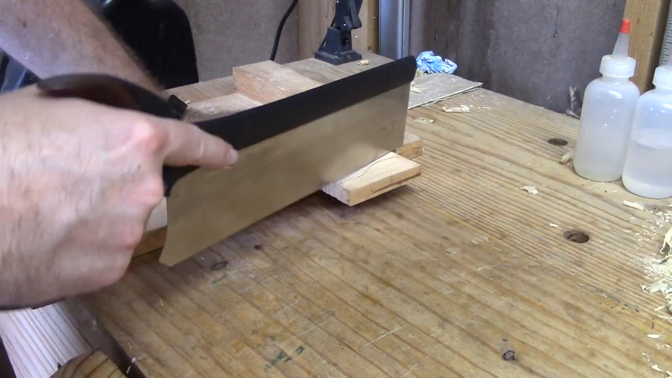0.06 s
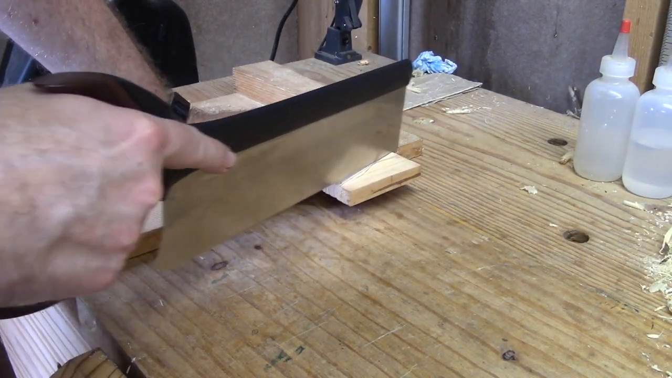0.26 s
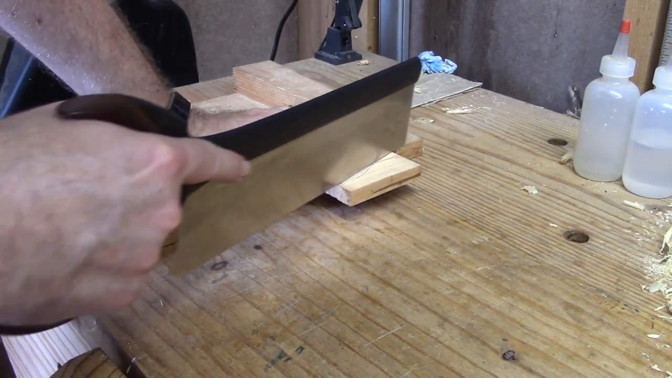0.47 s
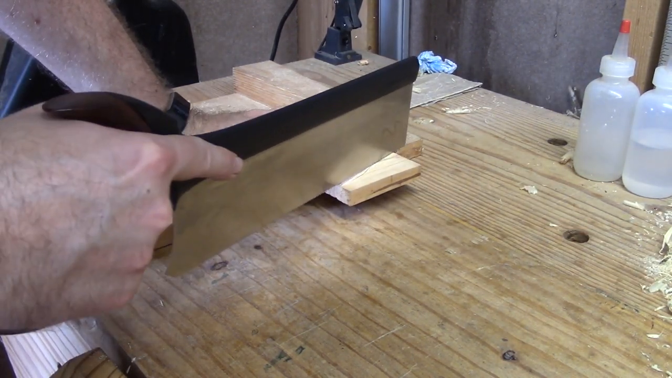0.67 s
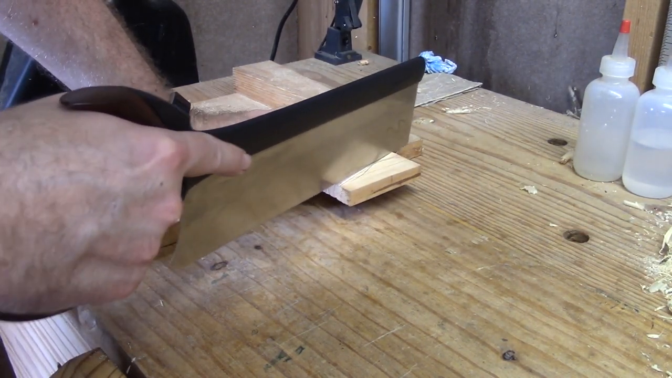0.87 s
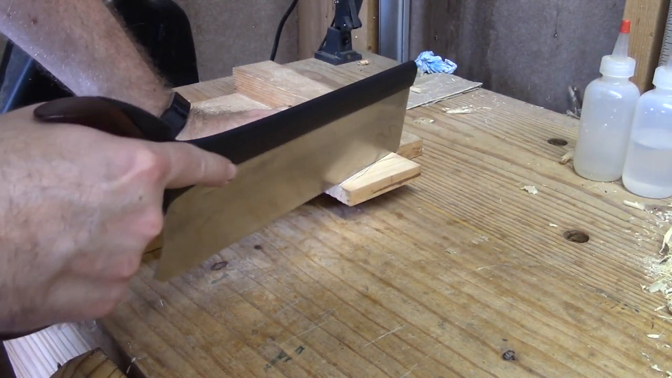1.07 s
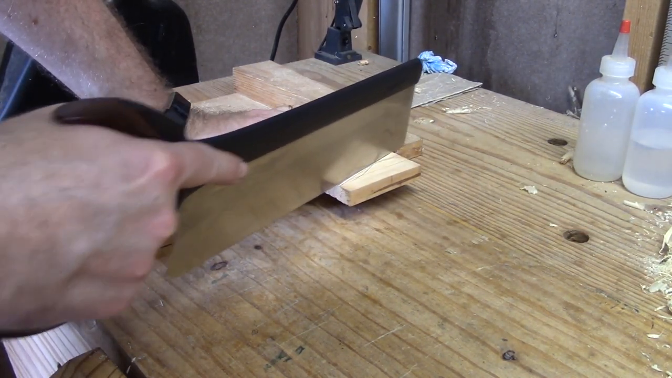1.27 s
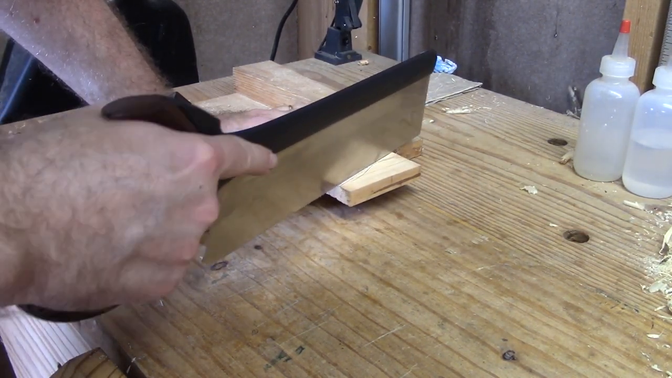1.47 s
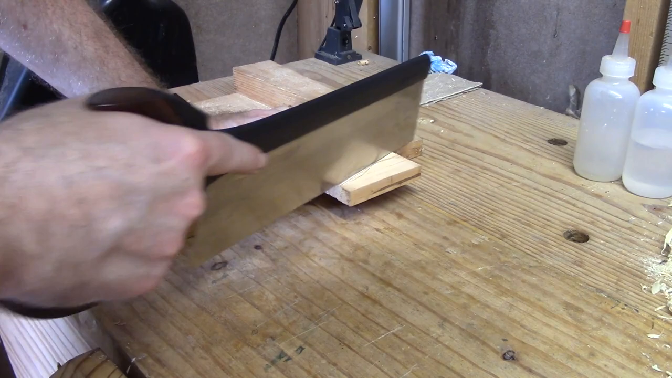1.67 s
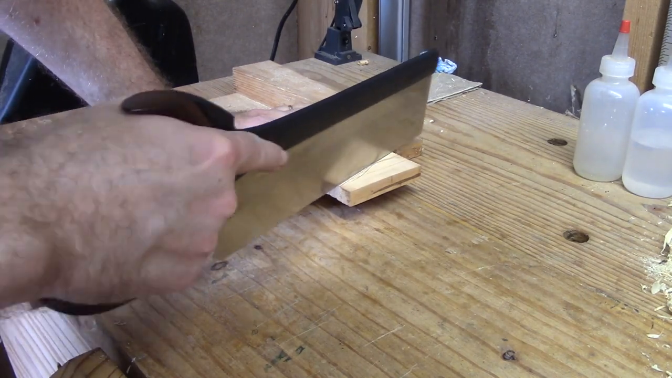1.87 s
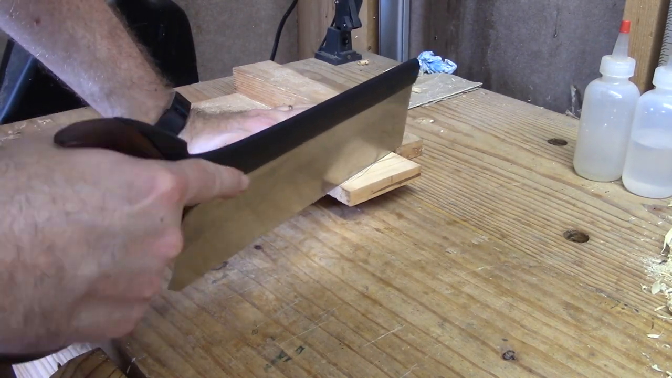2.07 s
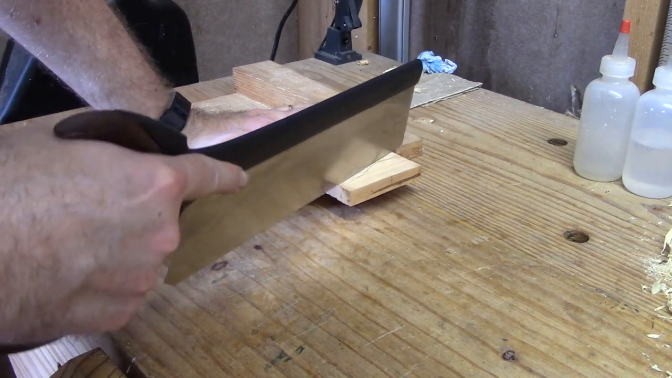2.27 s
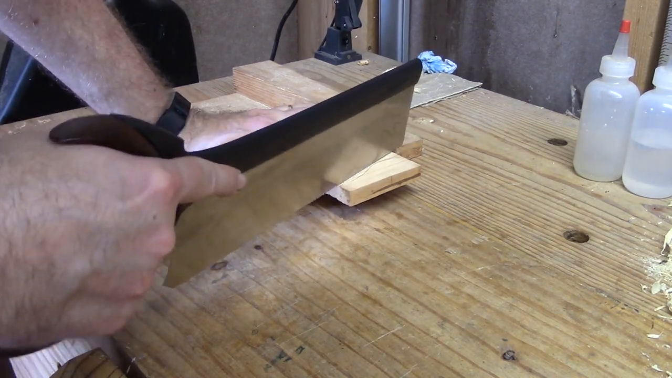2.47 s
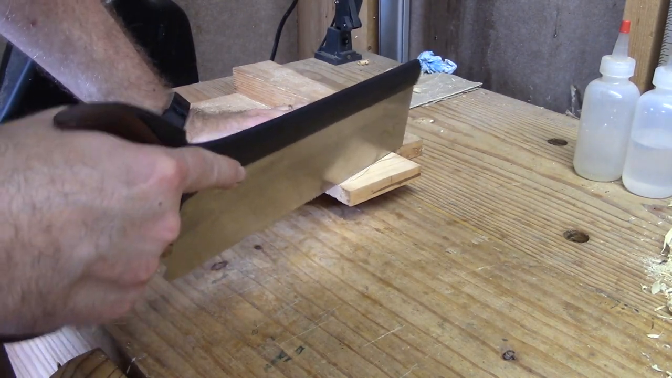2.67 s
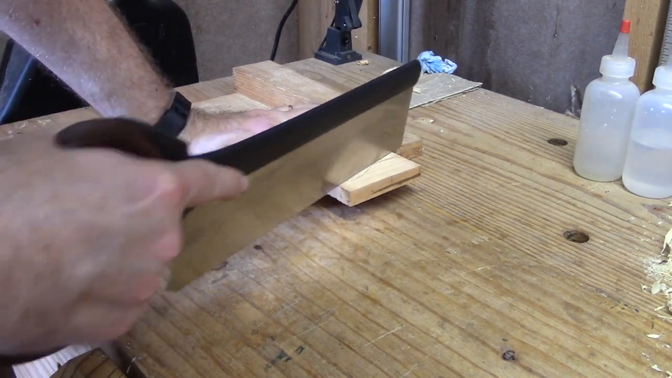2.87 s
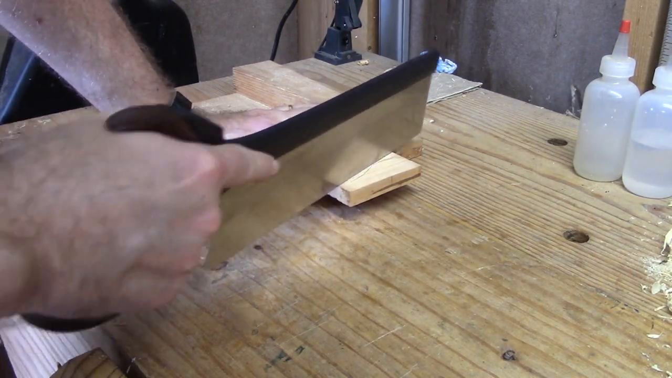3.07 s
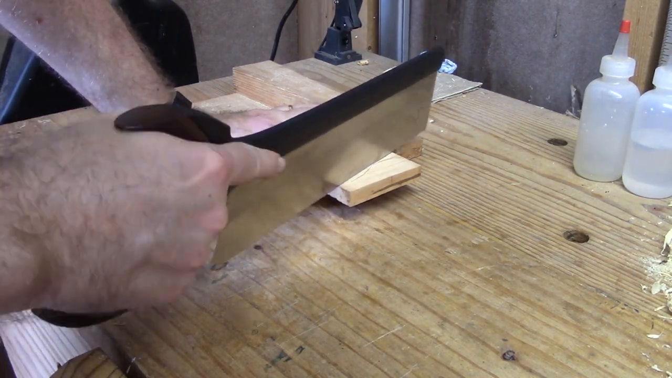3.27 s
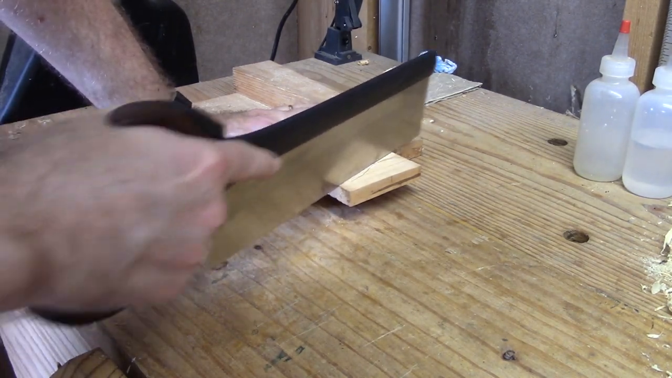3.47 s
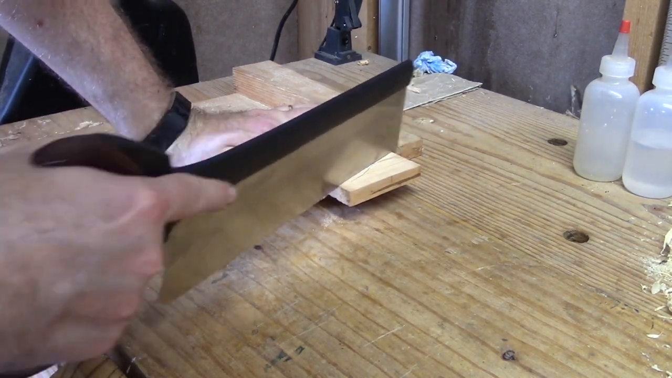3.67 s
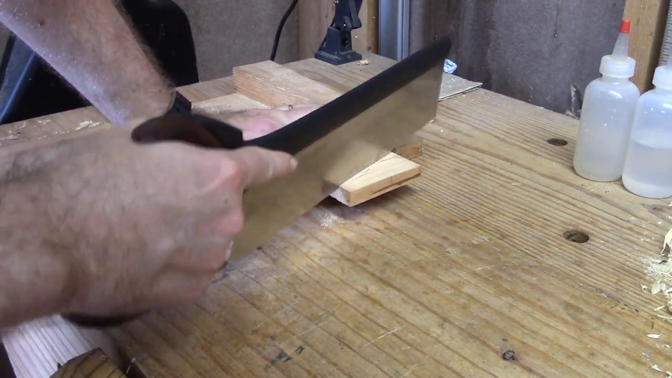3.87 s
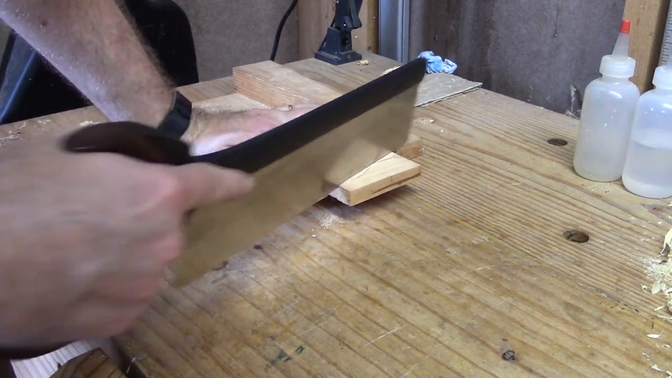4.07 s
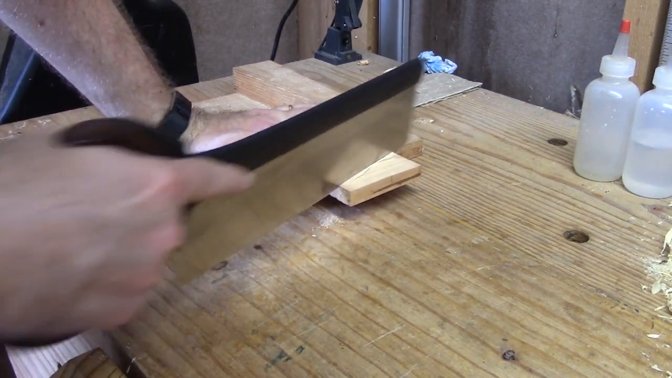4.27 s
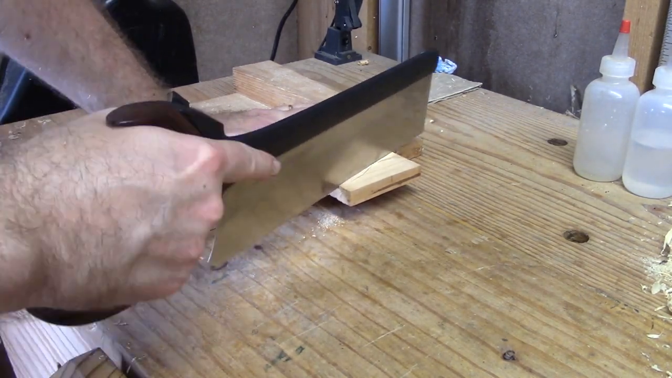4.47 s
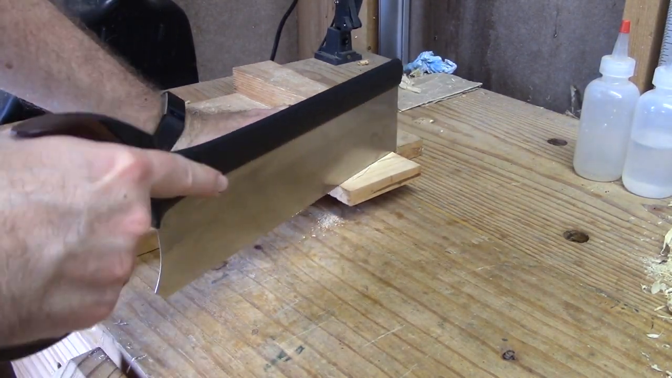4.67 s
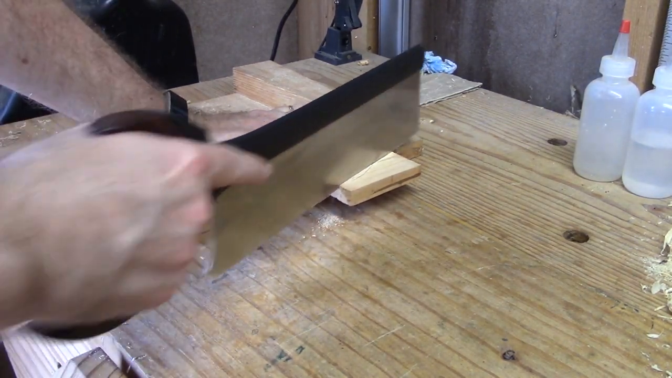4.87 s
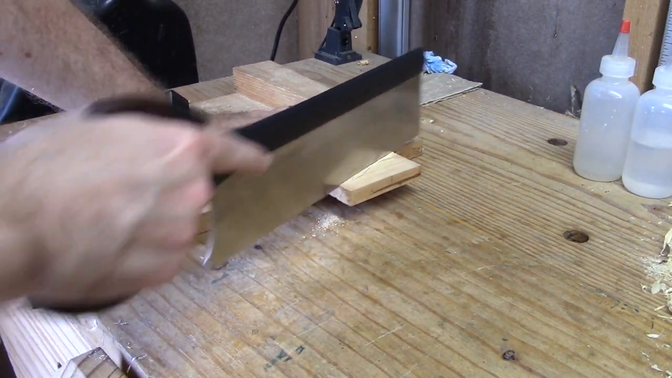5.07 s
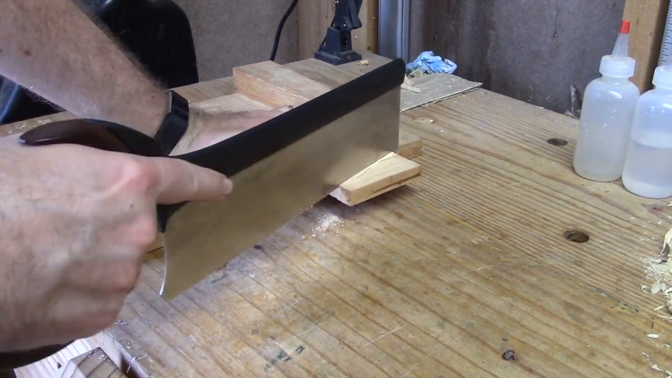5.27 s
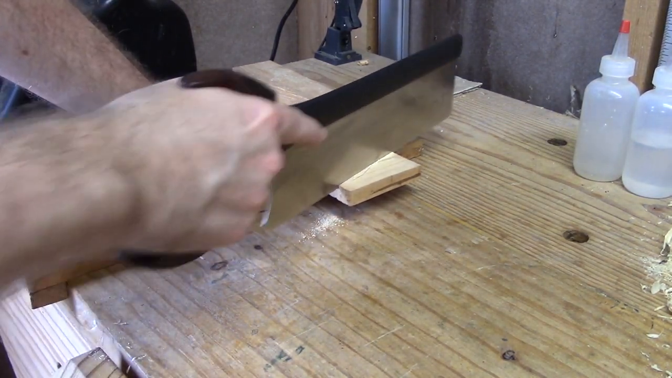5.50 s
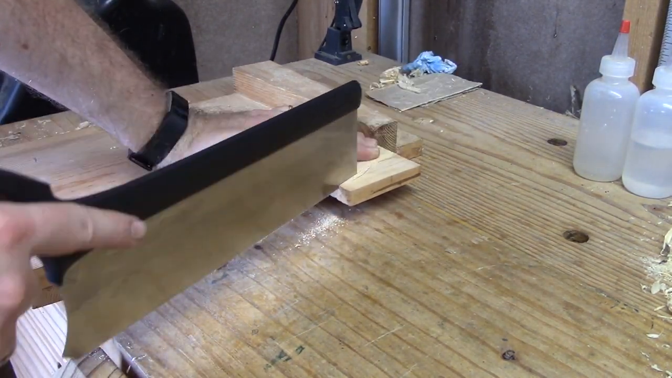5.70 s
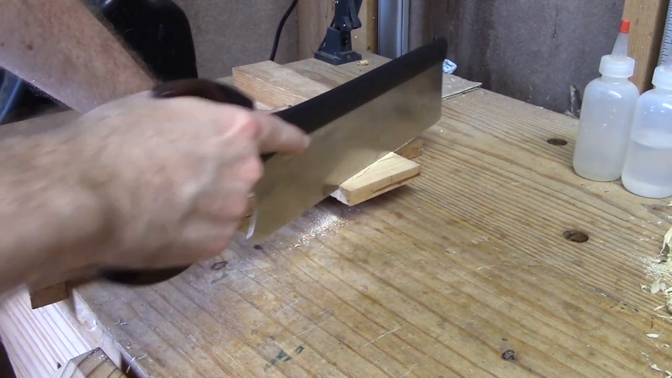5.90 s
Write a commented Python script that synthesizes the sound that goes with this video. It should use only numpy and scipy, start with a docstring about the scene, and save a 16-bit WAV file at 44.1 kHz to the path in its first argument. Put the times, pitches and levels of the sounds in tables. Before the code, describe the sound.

A thin metal saw blade rasps in small wood on a bench, heard close, nearly centred and dry with a short room tail. Tentative scratches give way to two steady runs of tiny strokes, about eight pushes a second, separated by a gap with ringing tooth taps. After another short hesitation come harder, brighter strokes with squeaky little chirps, cut off in mid-sawing over very faint room noise.

```python
"""Over faint room noise one hears the tail of a saw stroke and two light taps, then short nibbling strokes
with pauses in a small piece of wood close by, and at last harder strokes in which the blade binds and chirps.
Teeth tear fibres: ticks, snaps, rubbing noise and a whine excite the resonances of blade, block and bench.
In the pauses the teeth tap the cut, a sharp contact with a ringing tone. Chirps are brief gliding tones.
Decaying noise serves as the room's reverberation, and filtered noise as its air and a faint hiss."""
import sys
import numpy as np
from scipy import signal
from scipy.fft import rfft, irfft
from scipy.io import wavfile
from scipy.ndimage import uniform_filter1d

SR = 44100
rng = np.random.default_rng(int(sys.argv[2]) if len(sys.argv) > 2 else 0)


def inscribe(sig):
    """Save sig as 16-bit PCM at rate SR to the path in sys.argv[1].

    A 1-D sig is mono; a 2-D sig holds one channel per row.
    Samples are clipped to [-1, 1] before scaling.
    """
    pcm = np.round(np.clip(np.atleast_2d(sig).T, -1, 1) * 32767)
    wavfile.write(sys.argv[1], SR, pcm.astype(np.int16))


N = 261954
TIME = np.arange(N) / SR  # s

# spectrum of the workshop air, relative: frequency_hz, level_db
AIR_SPECTRUM = [(18, -76), (30, -37), (233, -25), (303, -9), (437, -4), (616, -8), (1010, 0.5),
                (1160, -2.5), (1390, 3.5), (1500, 2), (2540, -5.5), (2980, -5), (3220, -4.5), (8080, -10),
                (16000, -20.5)]
# spectrum of the air that differs between the ears, relative: frequency_hz, level_db
SIDE_AIR_SPECTRUM = [(18, -48), (30, -18), (320, -11), (538, -7), (794, -4), (2370, -16), (15000, -21)]
# course of the faint hiss: time_s, level_db
HISS_COURSE = [(0, -55), (0.8, -55.5), (1.65, -55), (2.3, -58), (2.7, -77), (5.94, -53)]

# edges of the knock, growl, rasp and sizzle registers: low_hz, high_hz
REGISTER_EDGES = [(150, 1100), (1100, 2600), (2600, 7000), (7000, 16000)]
REGISTER_FILTERS = [signal.butter(4, edges, "band", fs=SR, output="sos") for edges in REGISTER_EDGES]
# broad spectrum of the cut, relative within each register: frequency_hz, level_db
CUT_SPECTRUM = [(60, -66.5), (250, -45), (400, -35.5), (550, -22.5), (750, -11), (1000, -15.5), (1600, -19),
                (2400, -12), (4500, -7.5), (7000, -12), (9500, -4), (12000, -12), (15500, -10.5)]
# resonances of blade and bench, before their scatter: centre_hz, width_hz (at half the lift), lift_db
BODY_RESONANCES = [(1237, 44, 8.5), (1368, 145, 14.5), (1579, 148, 13.5), (1840, 133, 17.5),
                   (2159, 318, 15.5), (2462, 104, 9.5), (2914, 313, 12.5), (3200, 71, 4.5), (3413, 254, 9),
                   (3876, 270, 7), (4600, 500, 10), (5300, 550, 8.5), (5520, 110, 5), (5930, 85, 10.5),
                   (6646, 280, 7), (8020, 420, 5.5), (9100, 360, 1.5), (10350, 260, 6.5), (12140, 330, 9)]

# teeth set down on the wood: start_s, level_db (before the common lift in taps()),
# brightness_db (per register), ring_level_db, ring_pitch_hz
TOOTH_TAPS = [(0.074, -25.5, -1.5, -33.5, 1850), (0.137, -29, 2.5, -34, 4470),
              (0.673, -27.5, -4.5, -32, 1340), (0.703, -28, -3, -26.5, 1300), (2.335, -33.5, 9, -27, 2440),
              (2.709, -16, -0.5, -32, 2110), (2.787, -19, 0, -59, 1320), (4.538, -30, 3, -39, 1620)]
# level of each register in a plain tap, from knock to sizzle: level_db
TAP_REGISTER_DB = [-6.5, 0.5, -2.5, -15]
# tones of the blade sticking and slipping in the cut: middle_s, length_s, pitch_hz (halfway),
# pitch_loss (share of the pitch lost from start to end, negative where it rises), level_db
STICK_SLIP_CHIRPS = [(5.106, .03, 1316, .06, -26.5), (5.177, 0.024, 1334, 0.066, -26),
                     (5.214, 0.016, 850, .02, -32), (5.350, .016, 3070, 0.063, -25),
                     (5.416, 0.015, 3940, 0.018, -12), (5.423, .014, 3450, 0.13, -24),
                     (5.463, .018, 2360, 0.047, -27), (5.476, 0.019, 4940, 0.11, -15),
                     (5.576, 0.013, 4515, 0.01, -27), (5.593, .025, 890, 0.21, -35),
                     (5.632, .02, 3190, 0.22, -27), (5.640, .03, 2156, .2, -25.5),
                     (5.716, .018, 2990, .08, -22), (5.720, 0.016, 1895, 0.085, -24),
                     (5.781, 0.016, 3350, 0.032, -20), (5.782, 0.019, 2120, .05, -22.5),
                     (5.850, .018, 1387, -.04, -29), (5.855, 0.024, 804, -.03, -25)]

# the saw is pushed and its teeth cut; a push that peaks early grabs at once:
# middle_s, length_s, level_db, knock_db (against the rasp, before the register levels), peak_share (0-1)
PUSH_STROKES = [(0, 0.056, -34, -0.5, 0.38), (0.347, 0.051, -32.5, -8.0, 0.53),
                (0.456, 0.052, -29.5, -11, 0.44), (0.555, 0.051, -32.5, -12.5, 0.49),
                (0.597, 0.048, -35.0, -17, 0.56), (0.87, 0.047, -40, -4, 0.48),
                (1.018, 0.079, -35.0, -12.0, 0.39), (1.133, 0.054, -29.5, -10.0, 0.44),
                (1.254, 0.045, -32.5, -12.5, 0.46), (1.372, 0.052, -28.0, -7.5, 0.43),
                (1.483, 0.054, -24.5, -17.0, 0.45), (1.774, 0.056, -29.5, -11.5, 0.41),
                (1.898, 0.054, -28.0, -13.5, 0.43), (2.026, 0.047, -26, -18, 0.22),
                (2.148, 0.053, -26.5, -19, 0.42), (2.855, 0.044, -32.5, -9.5, 0.47),
                (2.963, 0.046, -25.5, -17, 0.49), (3.084, 0.048, -27.5, -13, 0.29),
                (3.186, 0.054, -25.5, -11.5, 0.38), (3.28, 0.046, -22, -26, 0.46),
                (3.398, 0.056, -27.5, -22, 0.26), (3.508, 0.065, -28.0, -6.0, 0.47),
                (3.639, 0.061, -25.5, -21.0, 0.3), (3.753, 0.057, -23, -19.5, 0.42),
                (3.878, 0.056, -23.0, -11.5, 0.42), (4.021, 0.061, -23.5, -11, 0.5),
                (4.179, 0.064, -23.5, -12.5, 0.45), (4.321, 0.069, -23.5, -13, 0.44),
                (4.469, 0.085, -28, -11.0, 0.52), (4.735, 0.03, -33, -7, 0.44),
                (4.86, 0.065, -26.5, -7.5, 0.54), (4.932, 0.076, -30.5, -3.5, 0.39),
                (5.113, 0.077, -25.5, -7.5, 0.37), (5.229, 0.066, -22.5, -13.5, 0.53),
                (5.345, 0.064, -23, -13, 0.42), (5.466, 0.066, -19.5, -15, 0.55),
                (5.635, 0.071, -18.0, -23, 0.49), (5.784, 0.077, -20.5, -17, 0.48),
                (5.92, 0.071, -21, -17, 0.33)]
# the saw is drawn back and its teeth drag: middle_s, length_s, level_db, knock_db (as for a push)
PULL_STROKES = [(0.244, 0.068, -42, -7.5), (0.3, 0.046, -37, -8.5), (0.402, 0.06, -38.0, -5),
                (0.504, 0.048, -37.5, -4.5), (0.741, 0.023, -47, -6), (0.929, 0.1, -43, -3),
                (1.077, 0.052, -35.5, -8.0), (1.192, 0.057, -37.0, -11), (1.314, 0.049, -35.5, -2.0),
                (1.428, 0.061, -33.5, -9), (1.612, 0.046, -35.5, -7.5), (1.719, 0.059, -35, -12.5),
                (1.842, 0.041, -34.0, -14.5), (1.957, 0.047, -30, -13), (2.085, 0.067, -33.5, -10),
                (2.216, 0.059, -32, -8.5), (2.91, 0.032, -33.0, -3.0), (3.017, 0.042, -32.0, -10.0),
                (3.132, 0.044, -29.5, -11), (3.233, 0.06, -30.5, -9), (3.342, 0.058, -33.5, -9.0),
                (3.451, 0.048, -30.5, -6.5), (3.576, 0.07, -34, -6.0), (3.697, 0.059, -29, -7.5),
                (3.814, 0.075, -30, -12.5), (3.952, 0.089, -32.5, -13.5), (4.108, 0.084, -31.5, -10.0),
                (4.257, 0.07, -27.0, -15), (4.4, 0.079, -30, -17), (4.683, 0.078, -36, -6),
                (4.799, 0.052, -42, 1.5), (5.06, 0.031, -41, 1), (5.171, 0.069, -31, -5),
                (5.286, 0.066, -30, -7), (5.409, 0.072, -29, -7), (5.573, 0.075, -25.5, -12),
                (5.707, 0.11, -27, -11), (5.847, 0.083, -31.5, -2.5)]
# how each register, from knock to sizzle, follows the speed of the hand:
# level_db, lead (on the peak, share of the stroke), steepness (exponent of the speed, at least 1 in use)
PUSH_REGISTERS = [(0, .1, 2), (-7.5, 0.077, 1.16), (0.5, -0.0057, 2), (0.5, 0.0071, 1.96)]
PULL_REGISTERS = [(0, -.03, 1.5), (-8.5, 0.057, 0.98), (0.5, 0.0056, 1.86), (-0.05, -0.023, 2.1)]
# sizzle against the rasp before the register levels, brighter as the work gets brisker: time_s, level_db
SIZZLE_COURSE = [(0, -3.5), (1.2, -5), (2.6, -4), (4.4, -3.5), (5.1, -1.5), (5.9, 0.1)]
# pitch of the block under a push, before its scatter; it shifts with the firmness of the hand's hold:
# time_s, pitch_hz
BLOCK_PITCH = [(0, 795), (1.1, 780), (1.9, 693), (2.9, 790), (3.6, 805), (4.4, 825), (5.1, 720), (5.3, 786),
               (5.9, 805)]


def undb(db):
    """Logarithmic level: 20 dB is a tenfold amplitude."""
    return 10 ** (np.asarray(db) / 20)


def unit(x):
    """Normalisation to a root-mean-square value of 1."""
    return x / np.sqrt(np.mean(x ** 2))


def add(out, x, start_s):
    """Superposition: mix x into out from start_s on."""
    i = max(int(start_s * SR), 0)
    out[i:i + len(x)] += x[:N - i]


def jitter(count, size):
    """Averaged random fluctuation: a running mean of noise, rescaled to a spread of 1."""
    return np.sqrt(size) * uniform_filter1d(rng.standard_normal(count), size, mode="wrap")


def response(spectrum, peaks=(), size=4096):
    """Minimum phase: the folded cepstrum turns a smooth spectrum with resonances into a causal impulse response."""
    hz = np.arange(size // 2 + 1) * SR / size
    points_hz, levels_db = np.transpose(spectrum)
    db = np.interp(np.log(hz + 1), np.log(points_hz), levels_db)
    for centre_hz, width_hz, lift_db in peaks:
        db = db + lift_db / (1 + (2 * (hz - centre_hz) / width_hz) ** 2)
    cepstrum = irfft(np.log(undb(db)))
    cepstrum[1:size // 2] *= 2
    cepstrum[size // 2 + 1:] = 0
    return irfft(np.exp(rfft(cepstrum)))


def ring(x, impulse):
    """Linear convolution: pass x through an impulse response scaled to unit energy."""
    return signal.fftconvolve(x, impulse / np.linalg.norm(impulse))


def air(spectrum, level_db, flutter_db=1.4):
    """Filtered noise: steady room air whose level flutters a little."""
    noise = ring(rng.standard_normal(N), response(spectrum))[:N]
    return noise * undb(level_db - flutter_db * jitter(N, size=3000))


def hiss(low_hz=3000, high_hz=8100):
    """Band-limited noise: a faint hiss that sinks during the first half and slowly returns."""
    band = signal.butter(2, [low_hz, high_hz], "band", fs=SR, output="sos")
    noise = unit(signal.sosfilt(band, rng.standard_normal(N)))
    return noise * undb(np.interp(TIME, *np.transpose(HISS_COURSE)))


def workshop(x, t60_s, dull_hz, build_s=0.00071):
    """Exponential reverberation decay: dense reflections build up quickly and fall 60 dB in t60_s."""
    age = TIME[:SR // 2]
    decay = undb(-60 * age / t60_s) * (1 - np.exp(-age / build_s))
    tail = rng.standard_normal(len(age)) * decay
    lowpass = signal.butter(1, dull_hz, fs=SR, output="sos")
    return ring(x, signal.sosfilt(lowpass, tail))[:N]


def body(force, block_hz=800, detune_hz=35, scatter_db=1.5, block_width_hz=150, block_db=8):
    """Forced resonance: blade, block and bench ring in each register; grip and contact point shift their modes."""
    centre, width, lift = np.transpose(BODY_RESONANCES)
    chance = rng.standard_normal((2, len(centre)))
    modes = zip(centre + detune_hz * chance[0], width, lift + scatter_db * chance[1])
    impulse = response(CUT_SPECTRUM, [(block_hz, block_width_hz, block_db), *modes], size=2048)
    registers = [ring(f, signal.sosfilt(sos, impulse)) for f, sos in zip(force, REGISTER_FILTERS)]
    return sum(registers)


def taps(tap_db=11.5, settle_s=0.0063, settle=0.11, ring_t60_s=0.041, upper_ratio=1.7, upper_db=-10):
    """Impulsive excitation: a sharp contact, decaying chatter of settling teeth and two ringing blade modes."""
    out = np.zeros(N)
    age = np.arange(4096) / SR
    for start_s, level_db, brightness_db, ring_level_db, ring_hz in TOOTH_TAPS:
        tilt_db = brightness_db * np.arange(-1, len(REGISTER_EDGES) - 1)
        register_db = level_db + np.array(TAP_REGISTER_DB) + tilt_db
        blow = settle * rng.standard_normal(len(age)) * np.exp(-age / settle_s)
        blow[0] = 1  # the contact itself
        force = np.outer(undb(register_db + tap_db), blow / np.linalg.norm(blow))
        add(out, body(force), start_s)

        swell = 1 - np.exp(-age * ring_hz)  # the ring builds up over about its first cycle
        phase = 2 * np.pi * ring_hz * age
        modes = np.sin(phase) + undb(upper_db) * np.sin(upper_ratio * phase)
        add(out, swell * undb(ring_level_db - 60 * age / ring_t60_s) * modes, start_s)
    return out


def chirps(waver=0.02, octave_db=-20):
    """Stick-slip oscillation: as the blade binds, brief tones with a weak octave glide, mostly downwards."""
    out = np.zeros(N)
    for middle_s, length_s, pitch_hz, pitch_loss, level_db in STICK_SLIP_CHIRPS:
        progress = np.linspace(0, 1, int(length_s * SR))
        glide = 1 - pitch_loss * (progress - .5)
        hz = pitch_hz * glide * (1 + waver * jitter(len(progress), size=60))
        phase = 2 * np.pi * np.cumsum(hz) / SR
        tone = np.sqrt(2) * (np.sin(phase) + undb(octave_db) * np.sin(2 * phase))
        swell = np.sin(np.pi * progress) ** 2
        add(out, undb(level_db) * swell * tone, middle_s - length_s / 2)
    return out


def hump(t, start, top, end):
    """Reciprocating motion: the hand's speed rises from rest to 1 at the top and falls to rest again."""
    return np.sin(np.pi * np.interp(t, [start, top, end], [0, .5, 1])).clip(0)


def whine(speed, whine_hz=2400, spread=0.27, glide=0.4, waver=0.038, overtone=0.25):
    """Incipient stick-slip: a rough tone rises and falls with speed, at a new pitch every stroke."""
    stroke_hz = whine_hz * np.exp(spread * np.clip(rng.standard_normal(), -2, 2))
    hz = stroke_hz * speed ** glide * (1 + waver * jitter(len(speed), size=25))
    phase = 2 * np.pi * np.cumsum(hz) / SR
    return np.sin(phase) + overtone * np.sin(2 * phase)


def teeth(speed, tooth_hz=1900, uneven=.2, bite_db=1.0, fibres_per_s=3500, fibre_db=3.5, fibre_share=1.0,
          rub=0.97, whine_share=0.17, judder_db=1.96):
    """Tooth-passing excitation: ticks, snapping fibres, rubbing flanks and a whine, all juddering together."""
    n = len(speed)
    # the offset keeps a few teeth passing near rest
    tooth_rate_hz = tooth_hz * (speed + .1) * np.exp(uneven * jitter(n, size=30))
    passed = np.cumsum(tooth_rate_hz) / SR
    tick_size, snap_size = rng.standard_normal((2, n)).clip(-2, 2)
    ticks = np.diff(np.floor(passed), prepend=0) * undb(bite_db * tick_size)
    snaps = (rng.random(n) < fibres_per_s / SR) * rng.choice([-1, 1], n) * undb(fibre_db * snap_size)
    rubbing = rub * rng.standard_normal(n)
    force = unit(ticks) + fibre_share * unit(snaps) + rubbing + whine_share * whine(speed)
    return unit(force * undb(judder_db * jitter(n, size=240).clip(-2, 2)))


def stroke(middle_s, length_s, level_db, knock_db, peak_share, registers, block_ratio=1,
           block_scatter=0.055, usual_knock_db=-9.5, growl_db_per_db=0.38):
    """Speed-dependent force: the cut grows with speed, each register swelling and fading on its own slope."""
    start, end = middle_s - length_s / 2, middle_s + length_s / 2
    t = TIME[(TIME > start) & (TIME < end)]
    # a stroke that knocks more than usual also growls more
    growl_db = growl_db_per_db * (knock_db - usual_knock_db)
    sizzle_db = np.interp(middle_s, *np.transpose(SIZZLE_COURSE))
    swells = []
    for colour_db, (register_db, lead, steepness) in zip([knock_db, growl_db, 0, sizzle_db], registers):
        top = start + np.clip(peak_share - lead, .15, .85) * length_s
        swell = hump(t, start, top, end) ** max(steepness, 1)
        swells.append(undb(level_db + colour_db + register_db) * swell)
    speed = hump(t, start, start + peak_share * length_s, end)
    block_hz = block_ratio * np.interp(middle_s, *np.transpose(BLOCK_PITCH))
    block_hz *= np.exp(block_scatter * rng.standard_normal())  # varies from stroke to stroke
    return body(np.array(swells) * teeth(speed), block_hz)


def strokes(pull_peak_share=.51, pull_block_ratio=1.1):
    """Reciprocating cutting: pushes, and pulls that peak about halfway and ring the block higher."""
    out = np.zeros(N)
    for middle_s, length_s, level_db, knock_db, peak_share in PUSH_STROKES:
        push = stroke(middle_s, length_s, level_db, knock_db, peak_share, PUSH_REGISTERS)
        add(out, push, middle_s - length_s / 2)
    for middle_s, length_s, level_db, knock_db in PULL_STROKES:
        pull = stroke(middle_s, length_s, level_db, knock_db, pull_peak_share, PULL_REGISTERS, pull_block_ratio)
        add(out, pull, middle_s - length_s / 2)
    return out


def scene(room_db=-24, side_room_db=-25, air_db=-50.5, side_air_db=-77, left_db=.16):
    """Sum and difference stereo: the saw is common to both ears; near reflections and some air differ."""
    saw = strokes() + taps() + chirps()
    room = undb(room_db) * workshop(saw, t60_s=0.2, dull_hz=4430)
    mid = saw + room + air(AIR_SPECTRUM, air_db) + hiss()
    near = workshop(saw, t60_s=0.0057, dull_hz=14700)
    # short waves differ more between the ears than long ones
    near = signal.lfilter([1, -.5], 1, near)
    side = undb(side_room_db) * near + air(SIDE_AIR_SPECTRUM, side_air_db)
    # the left is slightly raised and the right lowered as much
    return np.array([(mid + side) * undb(left_db), (mid - side) * undb(-left_db)])


def record(dry, ceiling=.95, top_hz=15900):
    """Saturation and band limiting: the recorder rounds the very highest peaks and cuts the top."""
    rounded = dry / (1 + (dry / ceiling) ** 6) ** (1 / 6)
    lowpass = signal.ellip(10, .1, 80, top_hz, fs=SR, output="sos")
    return signal.sosfilt(lowpass, rounded)


dry = scene()
out = record(dry)
inscribe(out)
```